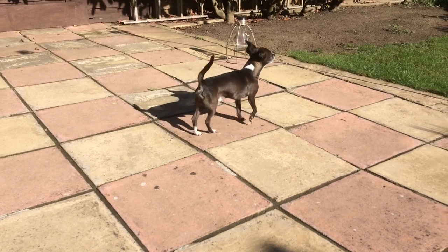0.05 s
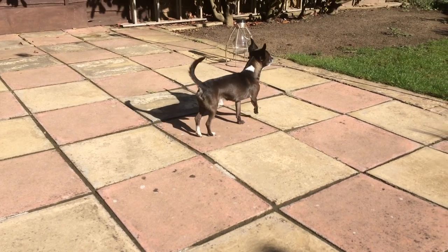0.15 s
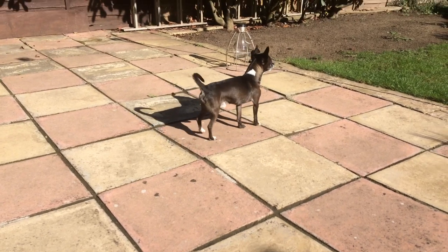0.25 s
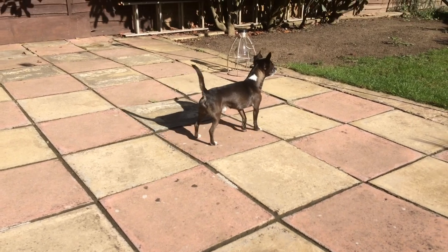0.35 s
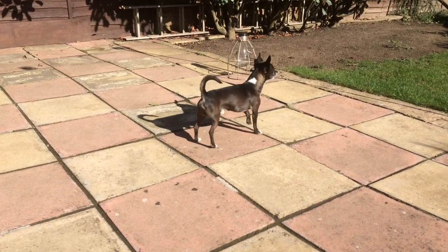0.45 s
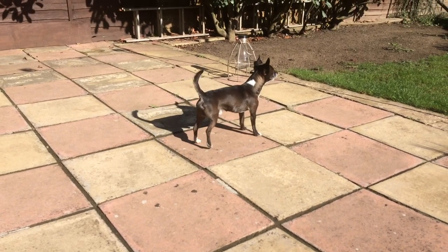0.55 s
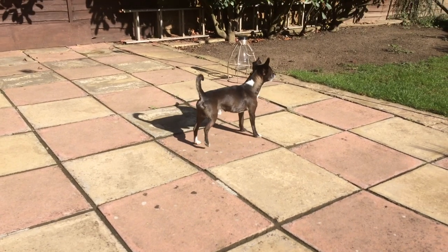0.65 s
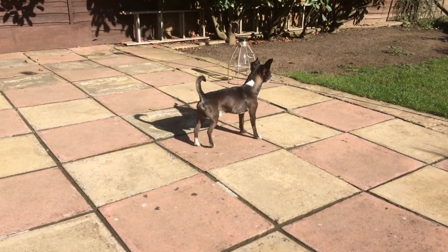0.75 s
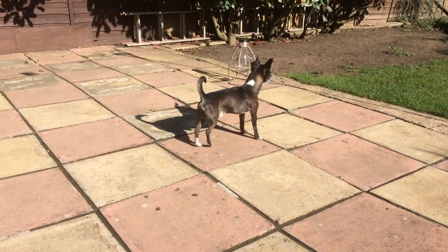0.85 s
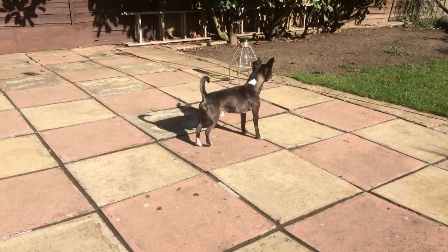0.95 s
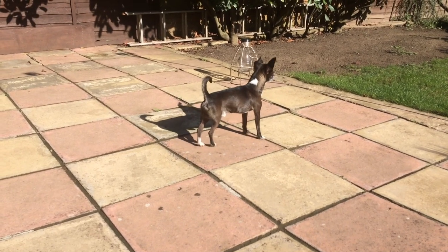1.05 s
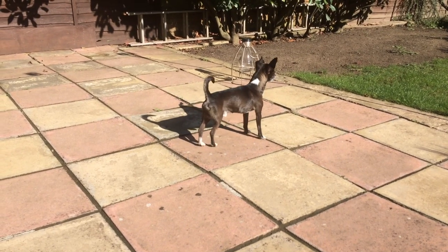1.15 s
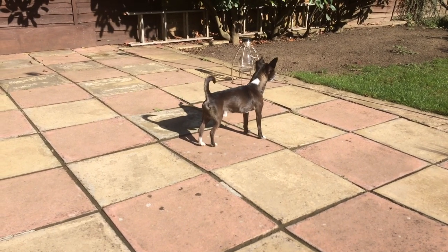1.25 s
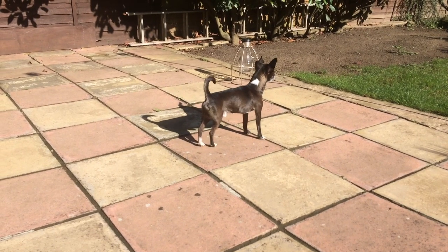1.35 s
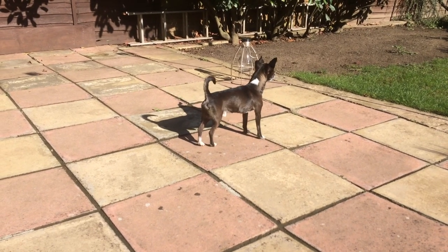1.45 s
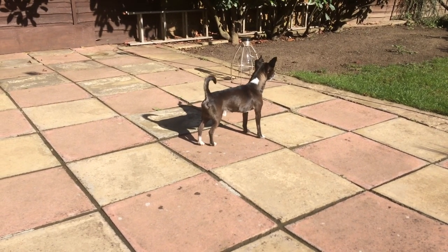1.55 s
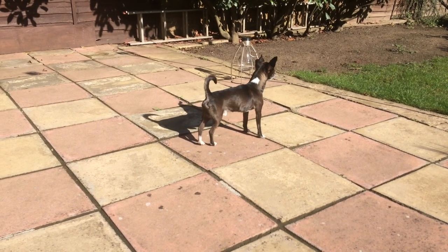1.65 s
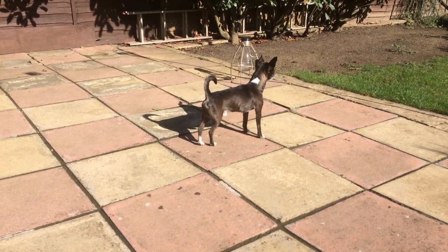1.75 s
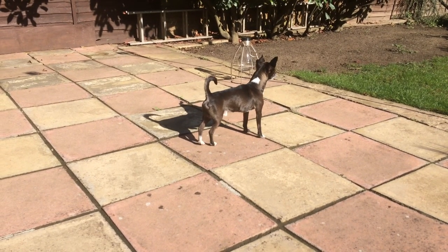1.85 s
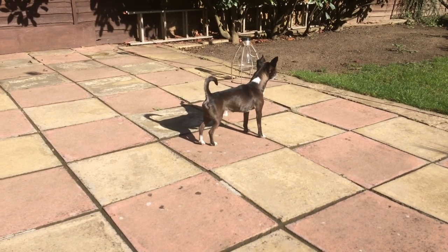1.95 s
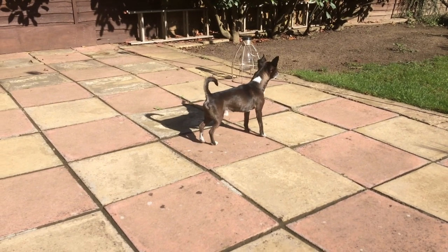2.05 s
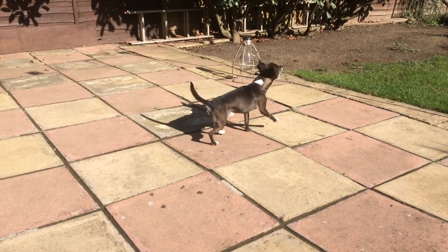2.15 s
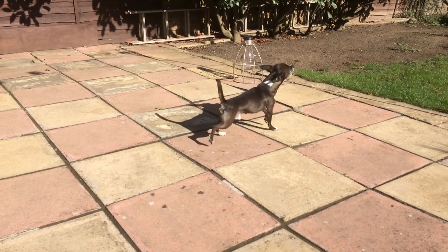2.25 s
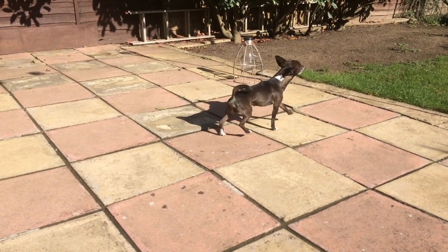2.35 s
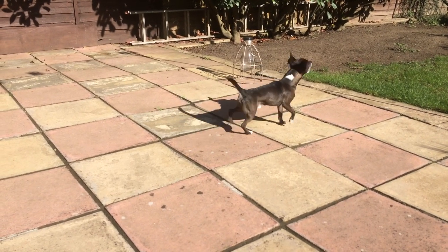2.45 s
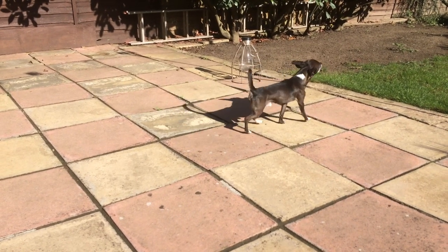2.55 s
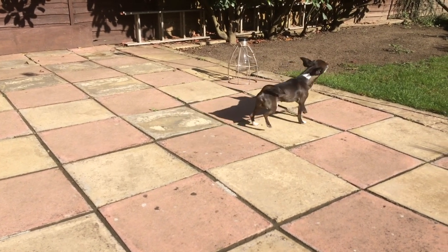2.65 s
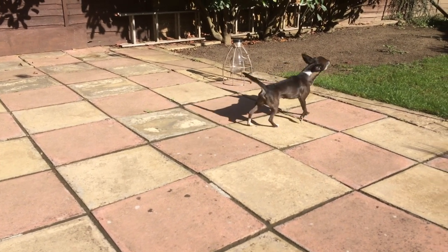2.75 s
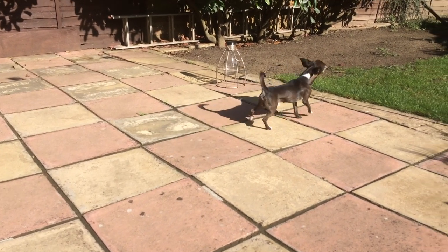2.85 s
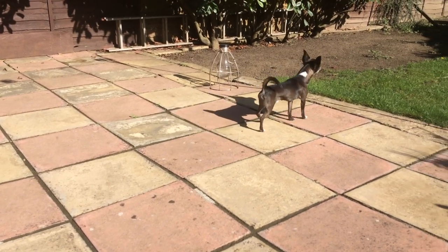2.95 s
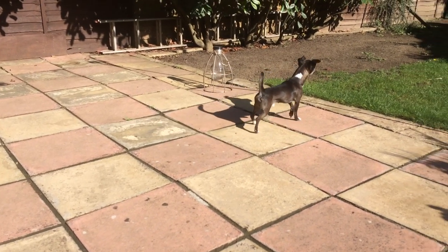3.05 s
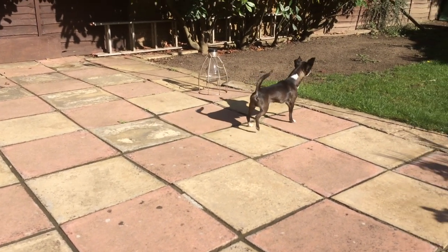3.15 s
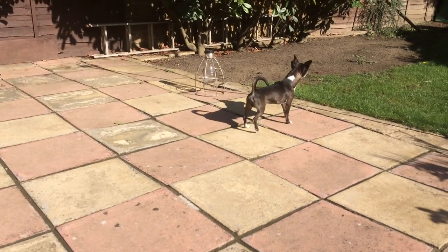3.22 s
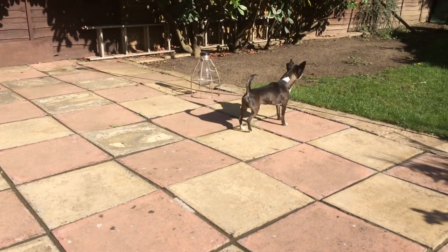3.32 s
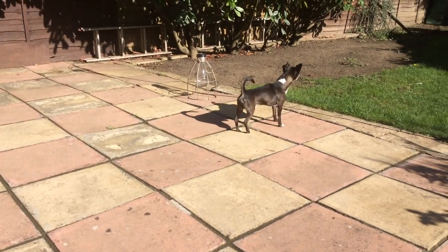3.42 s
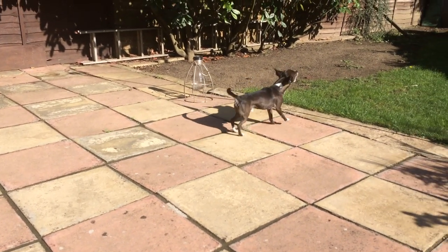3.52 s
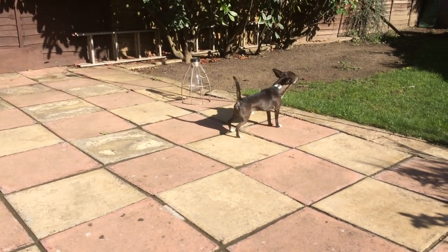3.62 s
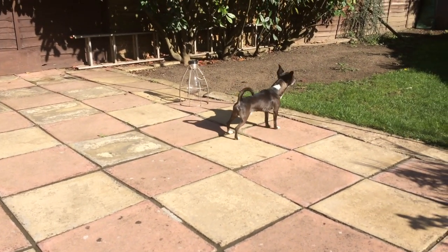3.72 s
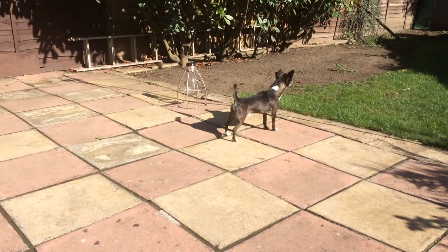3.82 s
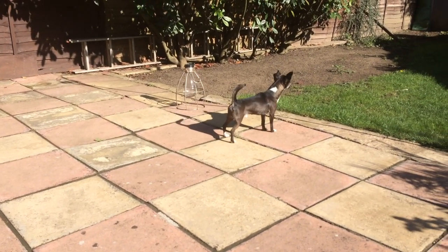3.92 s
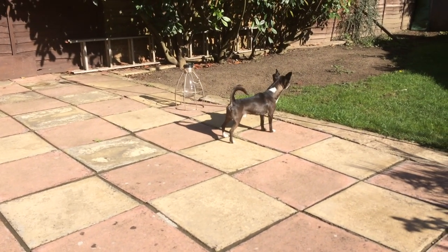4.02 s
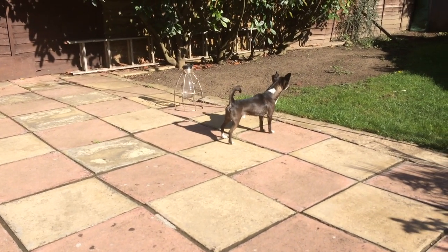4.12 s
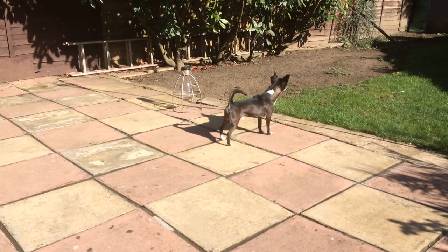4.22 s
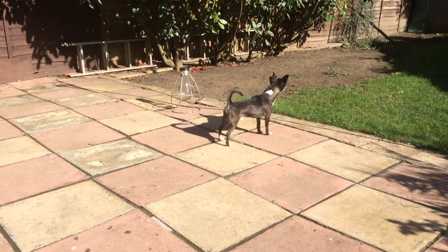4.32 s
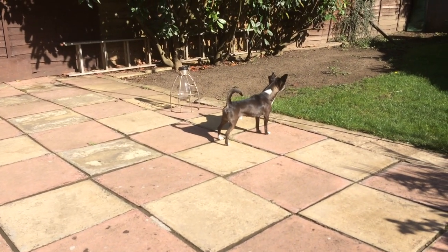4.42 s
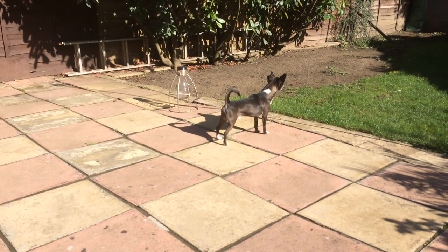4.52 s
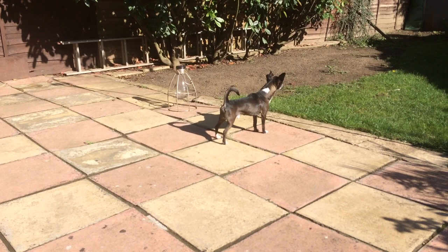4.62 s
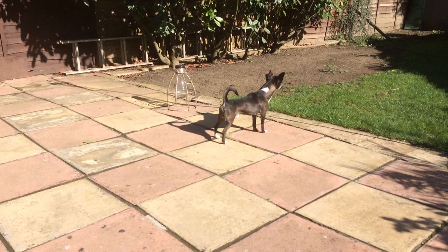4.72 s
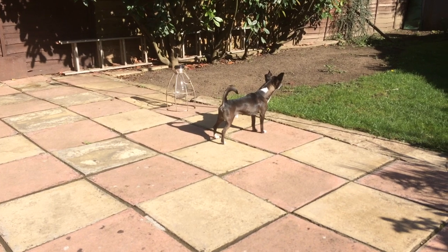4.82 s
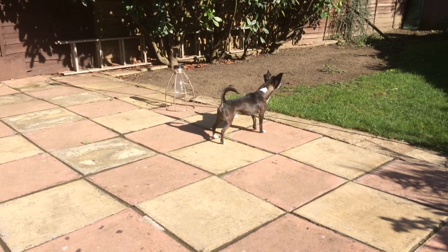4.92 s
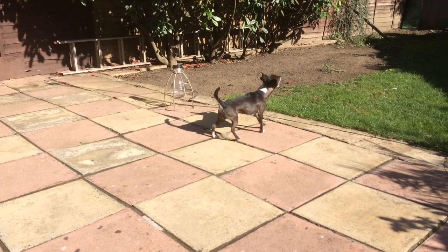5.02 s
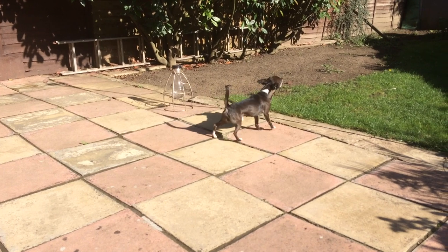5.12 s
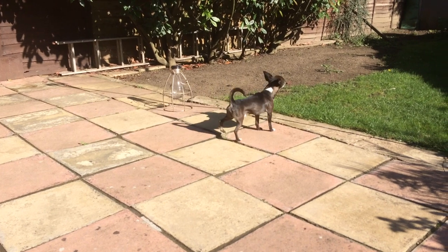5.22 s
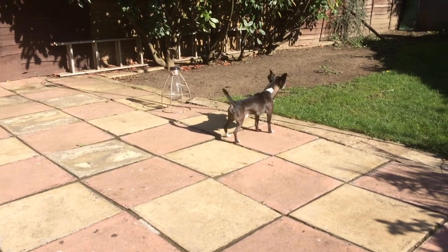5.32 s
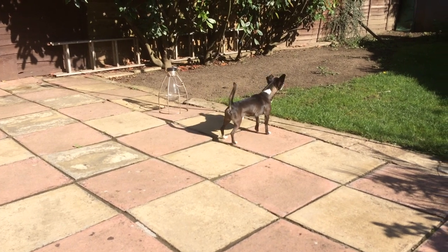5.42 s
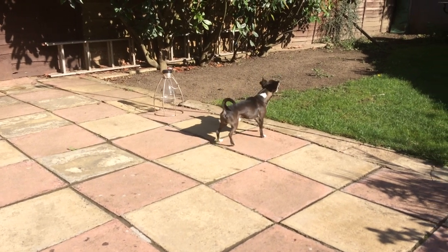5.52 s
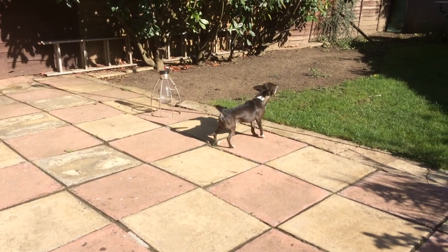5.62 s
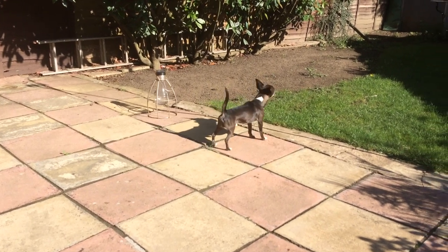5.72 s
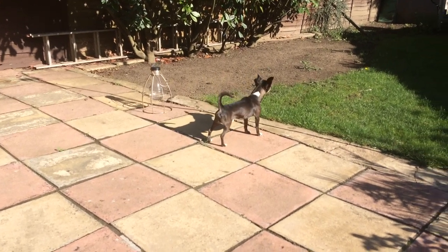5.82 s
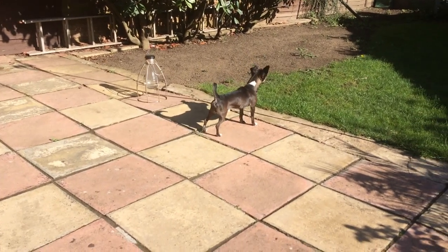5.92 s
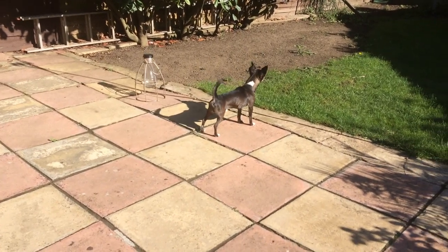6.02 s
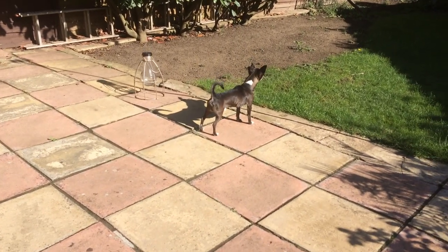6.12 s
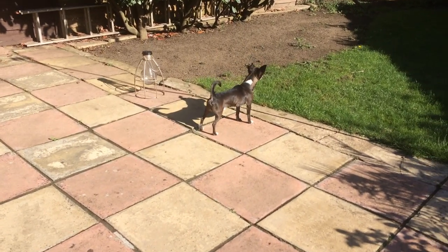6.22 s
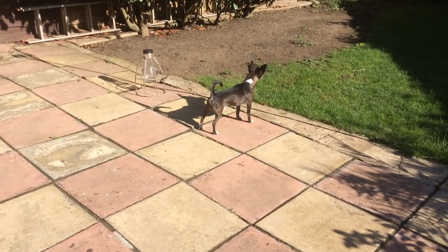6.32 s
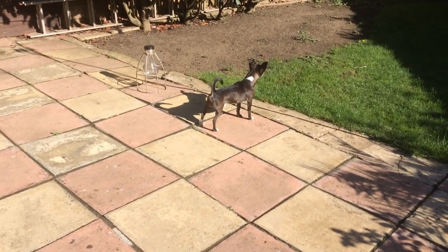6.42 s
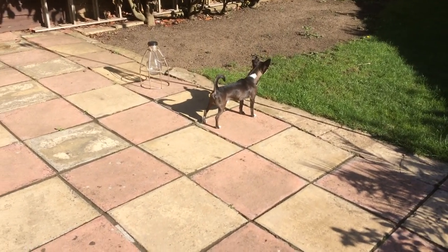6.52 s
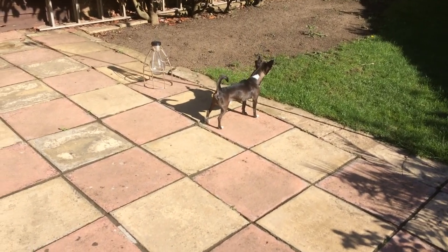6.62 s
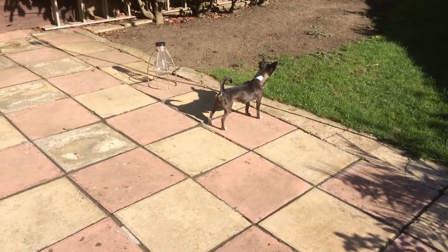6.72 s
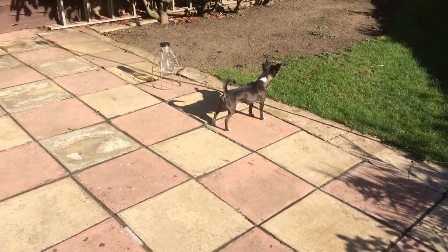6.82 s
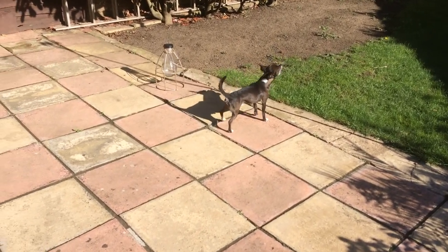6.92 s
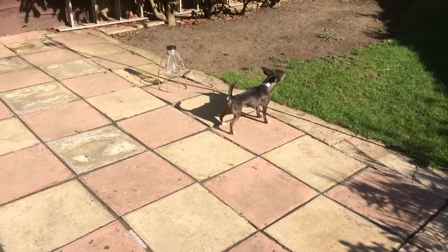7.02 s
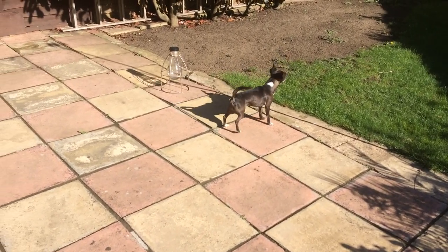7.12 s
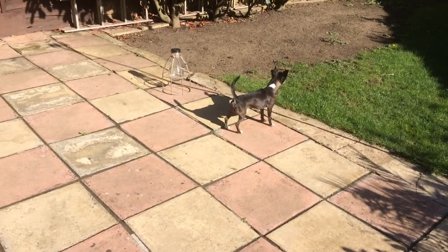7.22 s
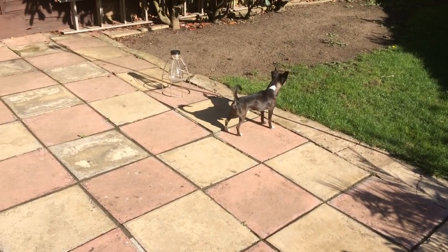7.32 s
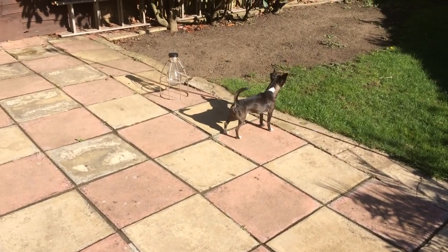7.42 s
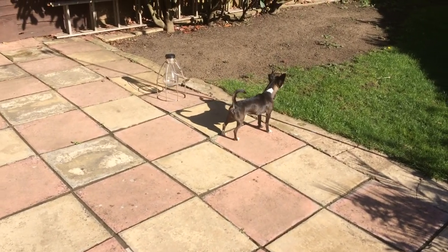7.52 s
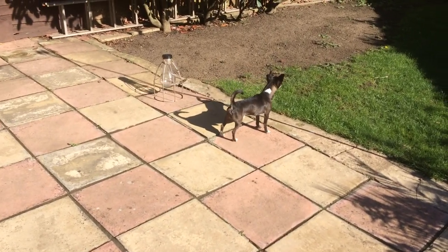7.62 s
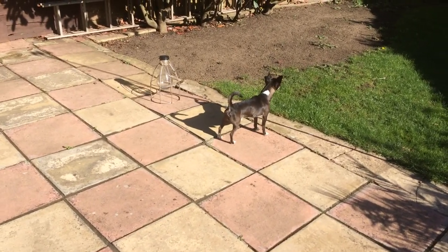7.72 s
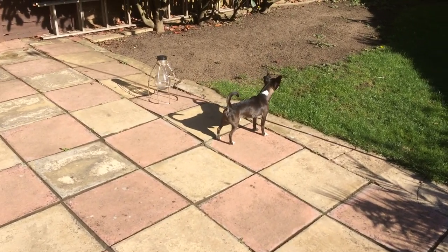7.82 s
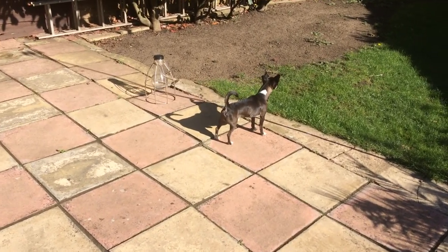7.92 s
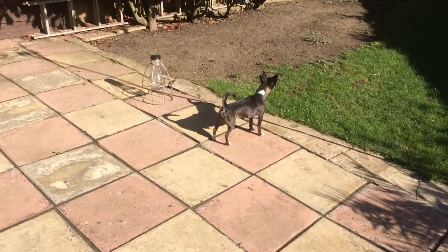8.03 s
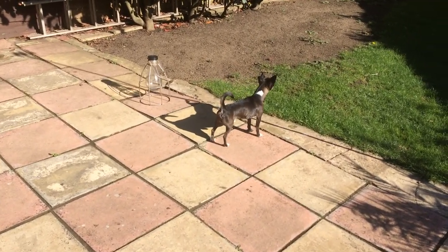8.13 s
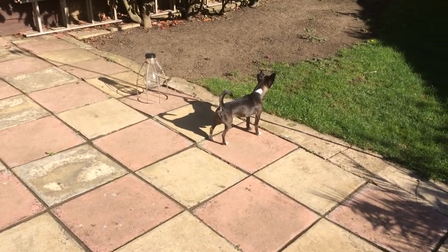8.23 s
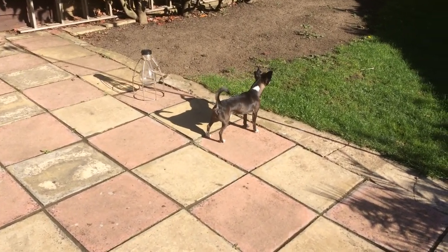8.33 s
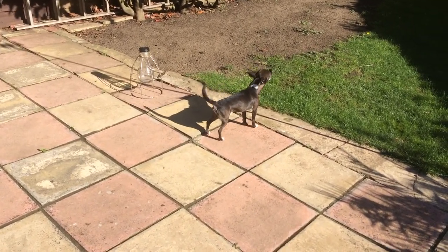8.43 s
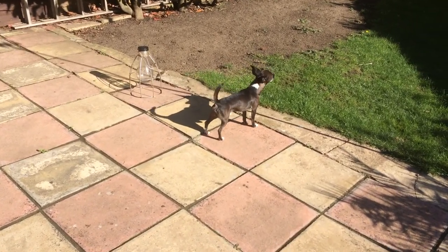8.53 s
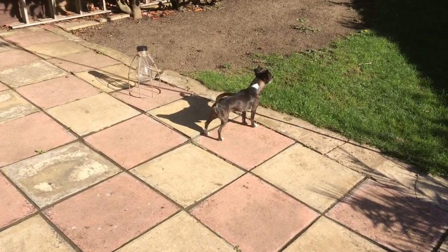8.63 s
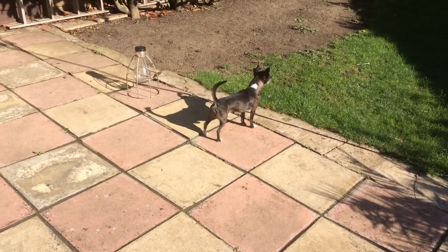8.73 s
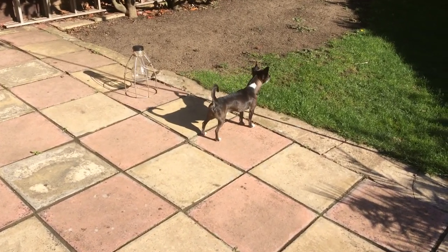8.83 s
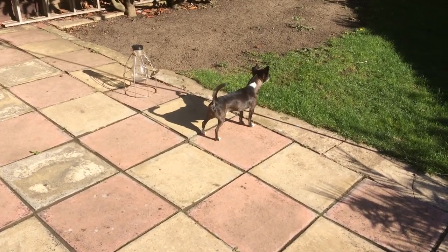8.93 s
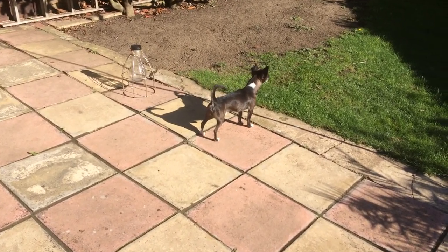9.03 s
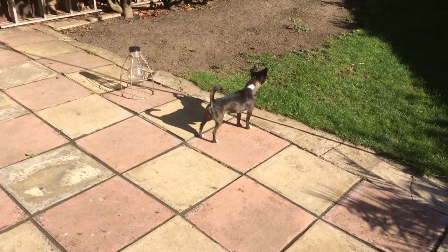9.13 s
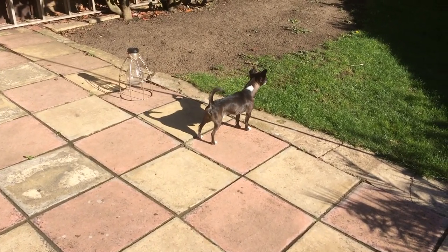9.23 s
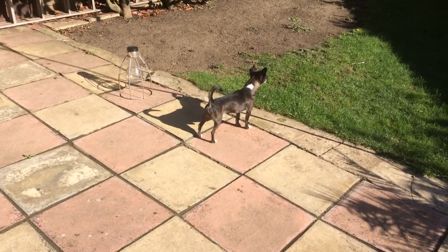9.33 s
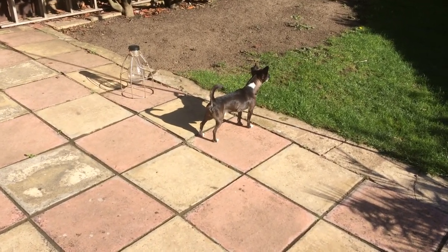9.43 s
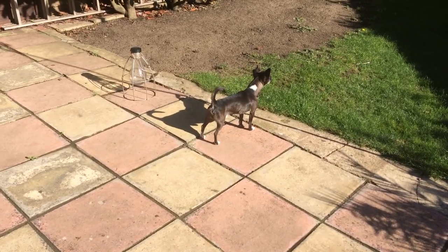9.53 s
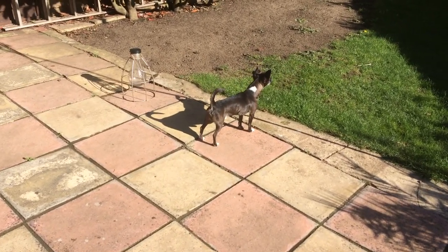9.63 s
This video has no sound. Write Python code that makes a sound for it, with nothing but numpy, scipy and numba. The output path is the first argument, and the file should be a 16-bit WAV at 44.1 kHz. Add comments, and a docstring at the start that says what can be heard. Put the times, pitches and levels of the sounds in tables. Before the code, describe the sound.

A small dog gives sharp, rough barks with pauses and faint growls between them, outdoors over a low steady hum.

```python
"""A small dog's sharp bark opens the scene; more follow on a garden patio, with faint growls between them.
Each bark is one push of air through a source and filter: rough vocal folds drive resonances that rise as
the jaw opens, the folds may lock into a clear yelp, and the pitch falls as the mouth shuts.
House and fence reflect the sound, claws tick on the slabs over a low outdoor hum,
and a limiter holds the peaks."""
import sys
import numpy as np
from scipy import signal
from scipy.fft import rfft, irfft, next_fast_len
from scipy.io import wavfile
from scipy.ndimage import uniform_filter1d, minimum_filter1d
from numba import njit

SR = 44100
rng = np.random.default_rng(int(sys.argv[2]) if len(sys.argv) > 2 else 0)


def to_wav(sig):
    """Store sig (one row per channel, or 1-D mono) as 16-bit WAV at the path in sys.argv[1].

    Samples outside -1..1 are clipped; the rate is SR.
    """
    pcm = np.clip(np.atleast_2d(sig), -1, 1) * 32767
    pcm = np.round(pcm).astype(np.int16)
    wavfile.write(sys.argv[1], SR, pcm.T)  # frames by channels


N = 426006

# spectrum of the outdoor background: frequency_hz, gain_db
GARDEN_SPECTRUM = [(15, -44.5), (25, -17.5), (48, -6), (70, -2), (178, -5), (230, -11.5), (338, -11.5),
                   (446, -10), (485, -6), (529, -9.5), (713, -15.5), (940, -14), (4100, -38.5), (5330, -72),
                   (9020, -120)]
# spectrum of the thin, even background hiss: frequency_hz, gain_db
AIR_SPECTRUM = [(1000, -8.5), (4000, 5), (8000, 3), (12000, 0), (16000, -7)]
# slow drift of the distant sounds: time_s, relative_wash_db, drone_db
DISTANT_LEVELS = [(0, -67.5, -74), (2, -65.5, -70), (4.4, -59.5, -73), (6.3, -61.5, -65.5),
                  (7.6, -68.5, -64), (9.66, -69.5, -67.5)]
# swells of the low hum: centre_s, half_width_s, rise_db
HUM_SWELLS = [(2.105, .1, 0.5), (4.182, 0.24, 6)]
# reflections from house, shed and fence: delay_s, gain_db
ECHOES = [(.017, -8.5), (0.032, -13), (.058, -14.5), (0.085, -23), (0.12, -25.5), (0.178, -38)]
# claws, grit and scuffs on the slabs: start_s, peak_db, ring_hz, width_hz, decay_s
CLAW_TICKS = [(0.246, -49, 10700, 8950, 0.0032), (0.879, -55, 2800, 900, 0.0048),
              (.968, -62, 2480, 900, 0.0082), (1.606, -56.5, 3970, 5000, 0.0027),
              (1.942, -59, 10900, 8900, .003), (2.168, -54, 10000, 10000, 0.0018),
              (2.287, -27, 9700, 11250, 0.027), (2.888, -45, 9500, 11000, 0.031),
              (5.529, -57.5, 5970, 6000, 0.0095), (5.887, -50, 4197, 5010, 0.0019),
              (7.927, -54, 2596, 3060, 0.0028), (8.309, -58.5, 4040, 4020, 0.0028),
              (8.89, -65, 3190, 1495, .02)]
# thin whistles that go with the growls: start_s, end_s, centre_hz, level_db
WHISTLES = [(.2, .56, 10700, -78.5), (3.8, 4.7, 10000, -81)]
# growls: start_s, end_s, first_db, last_db, surge_db, pitch_hz, roughness (0-1), throat_hz, chest_db
GROWLS = [ (.24, .53, -61, -45.5, -15, 110, 0.42, 604, 7),
          (3.86, 5.06, -53.5, -49.5, 17.5, 107, 0.8, 608, -1),
          (6.45, 6.93, -57.5, -60.5, 23, 104.1, 0.71, 628, 2), ]
# middle resonances of the mouth: shut_hz, open_hz, width_hz, gain_db
SECOND_FORMANTS = [(1495, 1695, 330, 1), (1778, 2500, 200, -14.5)]
# third and fourth resonances: shut_hz, open_hz, width_hz, gain_db
UPPER_FORMANTS = [(2262, 3020, 290, 2.5), (4050, 4000, 230, -16)]
# the muzzle absorbs the treble above the third formant: frequency_hz, gain_db
MUZZLE_RESPONSE = [(700, -2), (2850, -3.5), (3400, -8.5), (4350, -6), (4750, -24), (7000, -32.5)]
# spectrum of air rushing past the teeth: frequency_hz, gain_db
TEETH_SPECTRUM = [(3500, -19), (4300, 4.5), (4850, 1.5), (5300, 1), (6500, -2), (8200, 1), (10300, 3),
                  (11800, -5.5), (13300, -3), (16000, -7.5)]
# a closed-mouth whine that links two barks: time_s, pitch_hz, relative_level_db
WHINE_CURVE = [(2.655, 474.4, -36), (2.712, 450, -35), (2.744, 492, -33), (2.792, 555, -40)]
# barks: start_s, attack_s, hold_s, release_s, nominal_hz, pitch_fall (0-1), relative_level_db,
# second_db, upper_db, hoot_db, hiss_db, roughness (0-1), jaw (0-1), yelp_delay_s, yelp_db
BARKS = [ (-0.11, 0.0092, 0.13, 0.057, 497.6, 0, -24, -11.5, -13.5, -18, -33, 0.42, 0.84, 0.043, -1),
         (2.176, 0.033, 0.13, 0.15, 527, .5, -15.5, 4, -6, -5.5, -40.5, 0.95, .8, .135, 2.5),
         (2.478, 0.02, 0.14, 0.087, 475.8, 0.17, -20, -3, -7, -8, -43.5, 0.55, 0.66, .1, 12),
         (2.74, 0.01, .06, 0.14, 481, .5, -25.5, -3.5, -8, -10, -45, 0.4, 0.28, 0.11, 13.5),
         (3.519, 0.024, 0.14, 0.061, 515.2, 0.62, -19, 1, -6, -4.5, -40, 0.93, 0.79, 0.14, 11.5),
         (5.039, 0.032, 0.14, 0.11, 538, 0.49, -17, 2.5, -8.5, -9, -41, 0.72, 0.62, 0.15, 4),
         (5.562, .021, .14, 0.055, 527.6, .48, -20, 2, -9, -4.5, -41, 0.76, .75, 0.15, 6),
         (6.92, 0.034, .115, .11, 525.7, 0.46, -12.5, -4.5, -12, -13.5, -41.5, .75, 0.86, 0.12, 3.5),
         (8.409, 0.028, .14, 0.042, 525.7, 0.13, -15.5, -3, -12, -10, -42, 0.77, 0.9, .11, 5.5), ]

# main throat resonance, and the low one of a nearly closed mouth: shut_hz, open_hz, width_hz
FIRST_FORMANT, HOOT_FORMANT = (706, 1155, 259), (430, 735, 340)


def undb(db):
    """Decibels to amplitude ratio."""
    return 10 ** (np.asarray(db) / 20)


def unit(x):
    """Normalisation to an rms of one."""
    return x / np.sqrt(np.mean(x ** 2) + 1e-18)


def steady(x, span_s):
    """Normalisation to a running rms of one."""
    size = max(int(span_s * SR / 2), 8)
    power = uniform_filter1d(uniform_filter1d(x ** 2, size), size)
    return x / np.sqrt(np.abs(power) + 1e-12)


def curves(table, t):
    """Linear interpolation of a table's columns at times t."""
    time_s, *columns = np.transpose(table)
    return [np.interp(t, time_s, column) for column in columns]


def times(start_s, end_s):
    """Sample times of an interval, from zero at the earliest."""
    return np.arange(int(max(start_s, 0) * SR), int(end_s * SR)) / SR


def add(out, start_s, x):
    """Superposition of x on out from a start time."""
    i = max(int(start_s * SR), 0)
    out[i:i + len(x)] += x[:len(out) - i]


def edges(t, fade_s):
    """Linear fade in and out."""
    return np.clip(np.minimum(t - t[0], t[-1] - t) / fade_s, 0, 1)


def bump(t, centre_s, width_s):
    """Gaussian bell of height one."""
    return np.exp(-((t - centre_s) / width_s) ** 2)


def wander(t, rate_hz):
    """Smooth random modulation with a spread near one."""
    return 1.2 * np.interp(t * rate_hz % 4095, np.arange(4096), rng.standard_normal(4096))


def noise(t):
    """White noise at times t."""
    return rng.standard_normal(65536)[np.round(t * SR).astype(int) & 65535]


def phase_of(hz):
    """Phase in radians, the integral of frequency."""
    return 2 * np.pi * np.cumsum(hz) / SR


def band(x, low_hz, high_hz):
    """Band-pass filter with steep skirts."""
    return signal.sosfilt(signal.butter(3, [low_hz, high_hz], "band", fs=SR, output="sos"), x)


def colour(x, spectrum):
    """Spectral shaping by (frequency_hz, gain_db) points."""
    size = next_fast_len(len(x) + 1024)
    hz, db = np.transpose(spectrum)
    bins_hz = np.maximum(np.arange(size // 2 + 1) * SR / size, 1)
    gain = undb(np.interp(np.log(bins_hz), np.log(hz), db))
    return irfft(rfft(x, size) * gain, size)[:len(x)]


def resonate(x, hz, width_hz):
    """Two like resonators in cascade, for steep skirts."""
    b, a = signal.iirpeak(hz, hz / width_hz, fs=SR)
    return signal.lfilter(b, a, signal.lfilter(b, a, x))


@njit
def formant(x, hz, width_hz):
    """Two time-varying resonators in cascade, with a gain of one at the centre."""
    y = x.copy()
    for _ in range(2):
        mid, low = 0., 0.
        for i in range(len(x)):
            g, damping = np.tan(np.pi * hz[i] / SR), width_hz / hz[i]
            v = (mid + g * (y[i] - low)) / (1 + g * (g + damping))
            mid, low, y[i] = 2 * v - mid, low + 2 * g * v, damping * v
    return y


@njit
def peak_envelope(x, release_s):
    """Peak detection: instant rise, exponential decay."""
    out, peak = np.empty(len(x)), 0.
    for i in range(len(x)):
        peak = max(abs(x[i]), peak * (1 - 1 / (release_s * SR)))
        out[i] = peak
    return out


def garden(hum_db=-54, wash_gain_db=5, waver_db=2, air_db=-80, drone_hz=498):
    """Ambient noise is a superposition: distant traffic hum, a wash above it, a far drone, thin hiss."""
    t = np.arange(N) / SR
    wash_db, drone_db = curves(DISTANT_LEVELS, t)
    swell_db = sum(db * bump(t, centre_s, width_s) for centre_s, width_s, db in HUM_SWELLS)
    distant = colour(rng.standard_normal(N), GARDEN_SPECTRUM)
    hum = unit(band(distant, 38, 470)) * undb(hum_db + swell_db + waver_db * wander(t, 7.1))
    wash = unit(band(distant, 320, 2600)) * undb(wash_db + wash_gain_db + 1.5 * wander(t, 3.8))
    drone = np.sin(phase_of(drone_hz * (1 + 0.0067 * wander(t, 36))))
    drone *= undb(drone_db + 2 * wander(t, 3))
    air = unit(colour(rng.standard_normal(N), AIR_SPECTRUM)) * undb(air_db)
    return hum + wash + drone + air


def patio(x, dull_hz=5000):
    """Reflection and scattering: echoes from walls, diffuse tails from the hedge and farther houses."""
    t = np.arange(SR) / SR

    def tail(level_db, t60_s):
        """Diffuse sound builds up, then decays exponentially."""
        diffuse = rng.standard_normal(SR) * undb(-60 * t / t60_s) * np.minimum(t / 0.03, 1)
        return undb(level_db) * unit(diffuse) / np.sqrt(SR)

    hedge = tail(level_db=-19, t60_s=0.11)
    houses = band(tail(level_db=-27, t60_s=0.72), 850, 1900)
    response = hedge + houses
    for delay_s, gain_db in ECHOES:
        add(response, delay_s, undb([gain_db]))
    response = signal.lfilter(*signal.butter(1, dull_hz, fs=SR), response)
    return x + signal.fftconvolve(x, response)[:N]


def claws():
    """Impact and friction on stone: each tick or scuff is a decaying burst in a broad resonance."""
    out, t = np.zeros(N), np.arange(4096) / SR
    for start_s, peak_db, ring_hz, width_hz, decay_s in CLAW_TICKS:
        burst = rng.standard_normal(len(t)) * np.exp(-t / decay_s)
        scratch = resonate(burst, ring_hz, width_hz)
        add(out, start_s, undb(peak_db) * scratch / np.abs(scratch).max())
    return out


def whistle(t, centre_hz, level_db, width_hz=900):
    """Resonance narrows air noise to a very high band that swells and fades."""
    return unit(resonate(noise(t), centre_hz, width_hz)) * undb(level_db) * np.hanning(len(t))


def folds(t, pitch_hz, roughness, jitter=0.085, shimmer_db=-0.5, harmonics=11):
    """The glottal source: pulses and puffs of air, their timing and size unsettled by roughness."""
    phase = phase_of(pitch_hz * (1 + jitter * roughness * wander(t, 450)))
    pulses = unit(sum(np.cos(k * phase) for k in range(1, harmonics + 1)))
    puffs = 2 * noise(t) * (1 + 1.3 * np.cos(phase))
    shimmer = undb(shimmer_db * roughness * wander(t, 260))
    return pulses * shimmer, puffs * shimmer


def growl(t, first_db, last_db, surge_db, pitch_hz, roughness, throat_hz, chest_db,
          rasp=1.605, throb_hz=16, throb_db=4.5, surge_s=0.059):
    """Slack folds rattle behind a closed mouth: an amplitude-modulated resonance over a chest tone."""
    pulses, puffs = folds(t, pitch_hz, roughness)
    rattle = pulses + rasp * roughness * puffs
    throb = np.sin(phase_of(throb_hz * (1 + 0.32 * wander(t, 8.3))))
    ring = steady(resonate(rattle, throat_hz, width_hz=110), span_s=0.18) * undb(throb_db * throb)
    chest = undb(chest_db) * unit(band(rattle, 190, 540))
    # the end surges into the next bark, or dies away if surge_db is negative
    level_db = np.linspace(first_db, last_db, len(t)) + surge_db * np.exp((t - t[-1]) / surge_s)
    return unit(ring + chest) * undb(level_db) * edges(t, fade_s=0.01)


def vocal_tract(t, pitch_hz, roughness, mouth, first_db, second_db, upper_db, hoot_db, hiss_db,
                rasp=2.5, upper_rasp=1.8, parting_s=0.014, even_s=0.061):
    """Source and filter: the folds drive formants tuned by the mouth; air hisses past the teeth."""
    roughness, mouth = np.clip(roughness, 0, 1), np.clip(mouth, 0, 1) * np.ones(len(t))
    pulses, puffs = folds(t, pitch_hz, roughness)
    source = pulses + rasp * roughness ** 2 * puffs
    hoarse = source + upper_rasp * roughness * puffs  # the overtones turn hoarse sooner than the core

    def ring(x, shut_hz, open_hz, width_hz):
        """A cavity resonance that follows the jaw."""
        return formant(x, shut_hz + (open_hz - shut_hz) * mouth, float(width_hz))

    def parted(hz):
        """As the lips part, the higher resonances radiate last."""
        return np.minimum((t - t[0]) / (parting_s * hz / FIRST_FORMANT[0]), 1) ** 2

    def overtones(formants):
        """Parallel resonances driven by the hoarser source."""
        rings = sum(undb(db) * ring(hoarse, *shape) for *shape, db in formants)
        return steady(band(rings, 1100, 10000), even_s) * parted(formants[0][0])

    hoot = ring(source + 0.41 * roughness * puffs, *HOOT_FORMANT)
    voice = undb(hoot_db) * steady(band(hoot, 180, 590), even_s)
    voice += undb(first_db) * steady(ring(source, *FIRST_FORMANT), even_s)
    voice += undb(second_db) * overtones(SECOND_FORMANTS)
    voice += undb(upper_db) * overtones(UPPER_FORMANTS)
    voice = colour(voice, MUZZLE_RESPONSE)
    hiss = unit(colour(noise(t), TEETH_SPECTRUM)) * np.abs(signal.hilbert(voice))
    hiss *= (0.87 + roughness) * parted(UPPER_FORMANTS[0][0])
    hiss *= 0.6 + 0.6 * mouth  # more air gets past open jaws
    return (voice + undb(hiss_db) * hiss) * edges(t, fade_s=0.009)


def whine(t):
    """Nearly periodic vibration behind almost closed lips: a clear tone bending up into a bark."""
    pitch_hz, level_db = curves(WHINE_CURVE, t)
    return vocal_tract(t, pitch_hz, roughness=0.1, mouth=0.16, first_db=level_db - 12,
                       second_db=level_db - 5, upper_db=level_db - 9, hoot_db=level_db, hiss_db=-46)


def bark(t, attack_s, hold_s, release_s, nominal_hz, pitch_fall, level_db, second_db, upper_db,
         hoot_db, hiss_db, roughness, jaw, yelp_delay_s, yelp_db,
         scoop_s=0.018, sag_per_s=0.35, jaw_open_s=0.013, jaw_ease_per_s=1.3,
         attack_db=34, fade_db=28.5, hoot_attack_s=0.011, hoot_yield_s=0.092):
    """One push of air sets the folds oscillating; where they lock, the rough voice clears to a yelp."""
    closing = np.clip((t - hold_s) / release_s, 0, 1)
    scoop = 1 - 0.33 * np.exp(-t / scoop_s)
    pitch_hz = nominal_hz * scoop * (1 - sag_per_s * t) * (1 - pitch_fall * closing ** 1.5)
    mouth = jaw * (1 - np.exp(-t / jaw_open_s)) * (1 - jaw_ease_per_s * t) * (1 - 0.65 * closing)
    yelp = bump(t, yelp_delay_s, width_s=0.028)
    clarity = 0.8 * (1 - np.exp(-abs(yelp_db) / 3.5))  # a stronger yelp is clearer
    roughness = roughness * (1 - clarity * yelp) * (1 - 0.62 * np.sqrt(closing))
    effort_db = level_db - attack_db * np.exp(-t / attack_s) - fade_db * closing
    push_db = 4 * bump(t, centre_s=0.05, width_s=0.02)  # the first push lifts the second formant
    # the low hoot leads, gives way as the mouth gapes, and stands out again as it shuts
    gape = np.minimum(t / hoot_yield_s, 1) ** 2 * (1 - closing)
    low_db = level_db + hoot_db - attack_db * np.exp(-t / hoot_attack_s) - 13 * gape - 13.5 * closing
    return vocal_tract(t, pitch_hz, roughness, mouth, first_db=effort_db + yelp_db * yelp,
                       second_db=effort_db + second_db + push_db, upper_db=effort_db + upper_db,
                       hoot_db=low_db - yelp_db * yelp, hiss_db=hiss_db)


def dog(voice_gain_db=2):
    """The direct sound: barks, whine, growls and whistles in superposition."""
    out, gain = np.zeros(N), undb(voice_gain_db)
    for start_s, attack_s, hold_s, release_s, *shape in BARKS:
        t = times(start_s, start_s + hold_s + release_s) - start_s
        add(out, start_s, gain * bark(t, attack_s, hold_s, release_s, *shape))
    start_s, end_s = WHINE_CURVE[0][0], WHINE_CURVE[-1][0]
    add(out, start_s, gain * whine(times(start_s, end_s)))
    for table, sound in (GROWLS, growl), (WHISTLES, whistle):
        for start_s, end_s, *shape in table:
            add(out, start_s, sound(times(start_s, end_s), *shape))
    return out


def scene():
    """Sound pressures add in one channel: the dog with its echoes, its claws and the garden."""
    return (patio(dog()) + claws() + garden())[None]


def record(dry, ceiling_db=-6.5, release_s=1.0, cutoff_hz=15800):
    """Look-ahead limiting: the gain ducks at loud peaks and recovers slowly; a low-pass cuts the top."""
    gain = np.minimum(1, undb(ceiling_db) / (peak_envelope(dry[0], release_s) + 1e-9))
    gain = uniform_filter1d(minimum_filter1d(gain, size=64), size=64)
    low_pass = signal.ellip(8, 0.2, 70, cutoff_hz, fs=SR, output="sos")
    return signal.sosfilt(low_pass, dry * gain)


dry = scene()
out = record(dry)
to_wav(out)
```